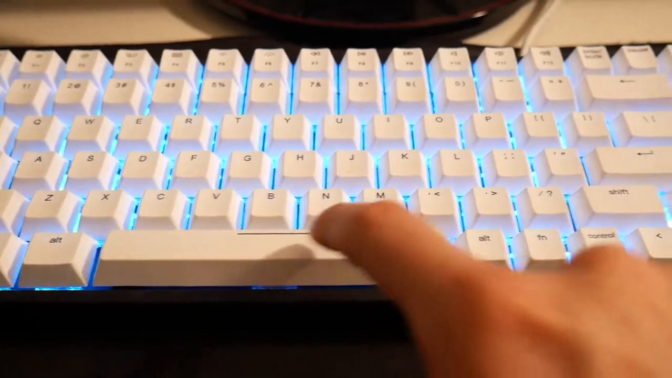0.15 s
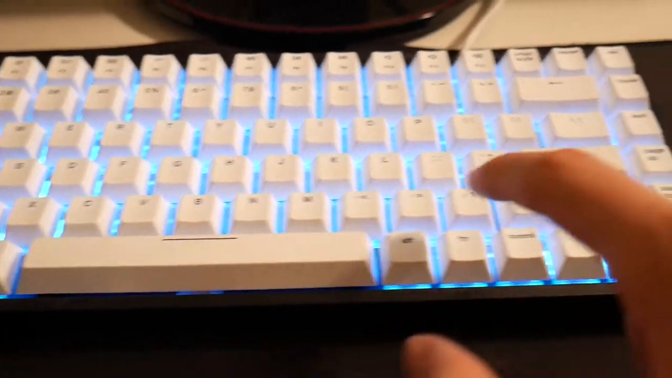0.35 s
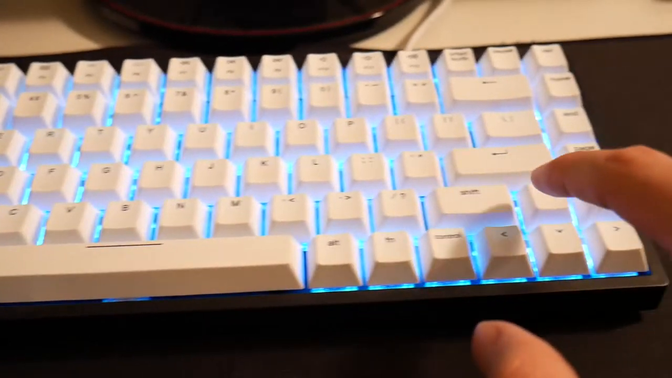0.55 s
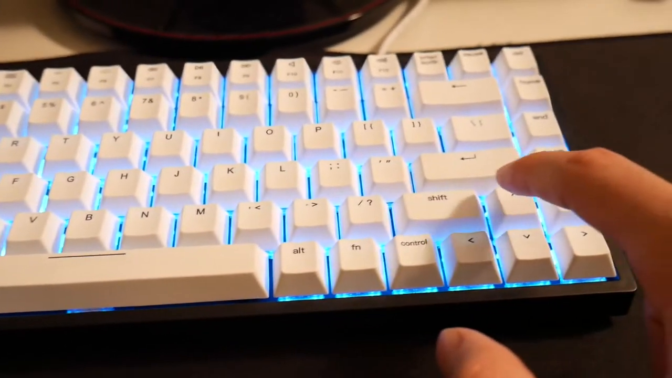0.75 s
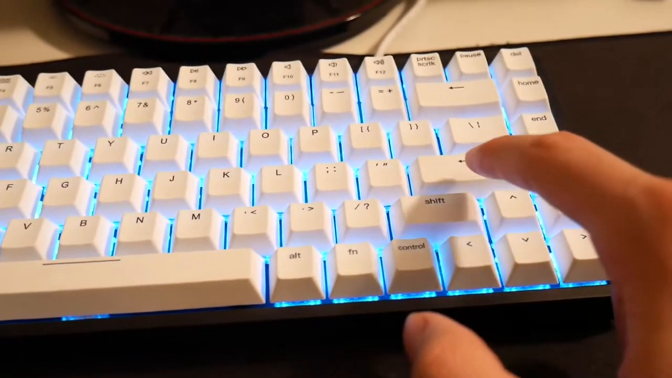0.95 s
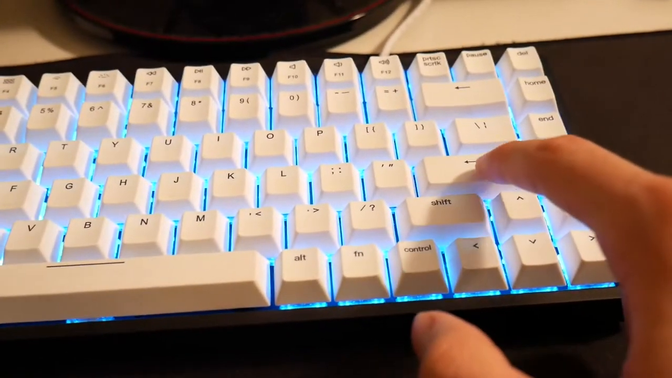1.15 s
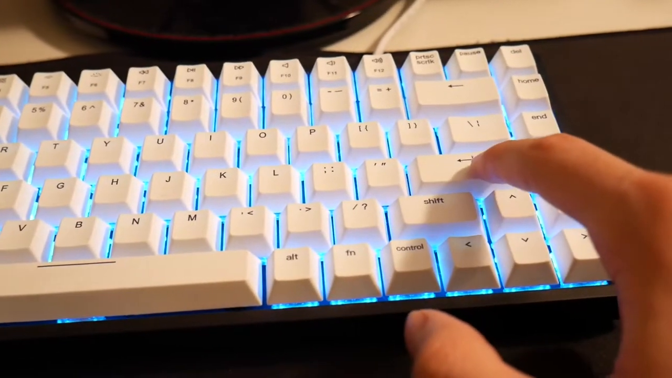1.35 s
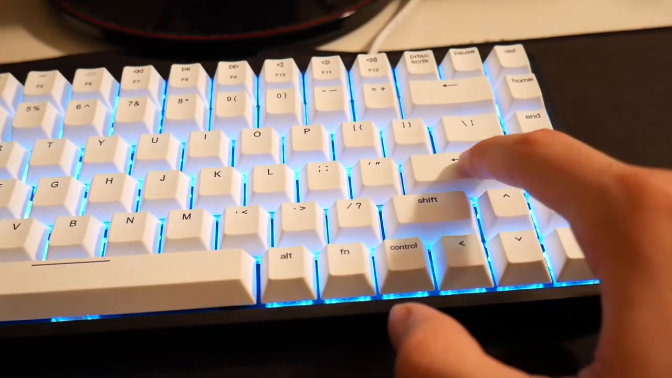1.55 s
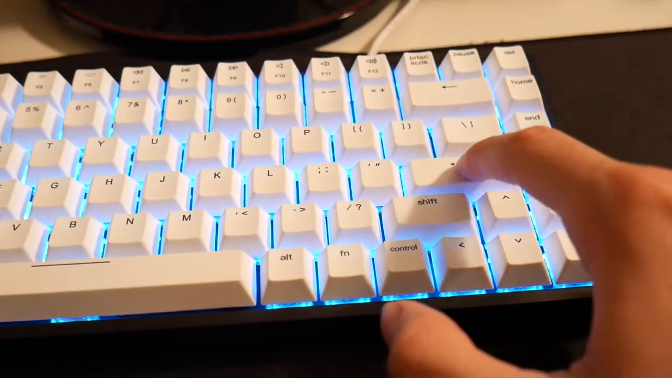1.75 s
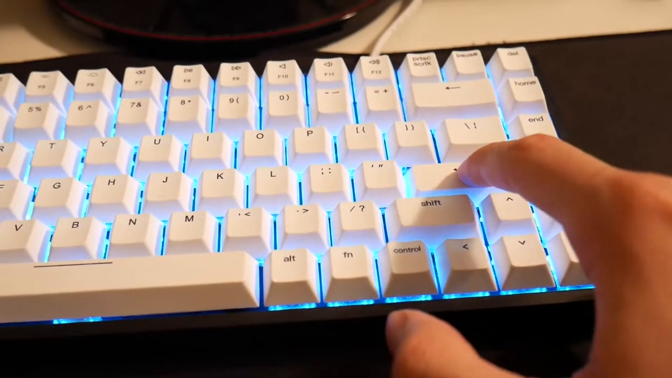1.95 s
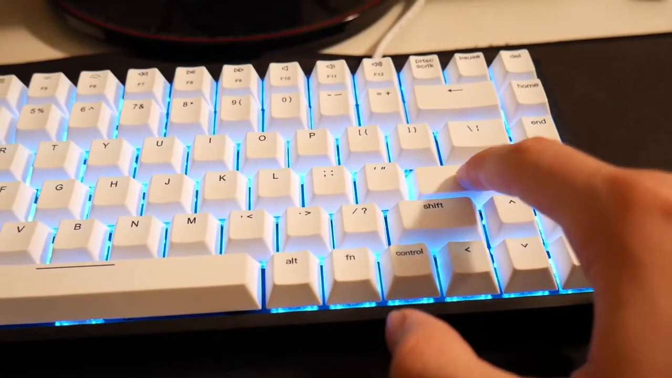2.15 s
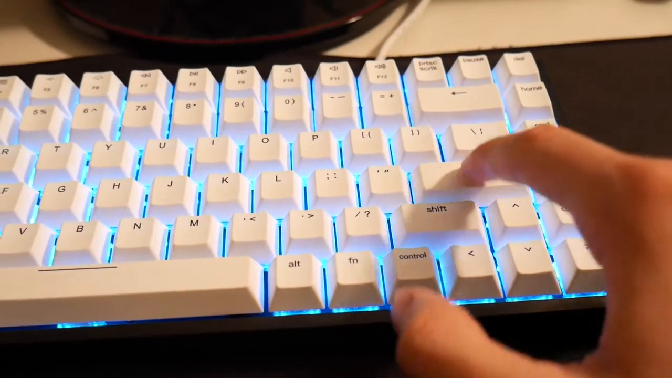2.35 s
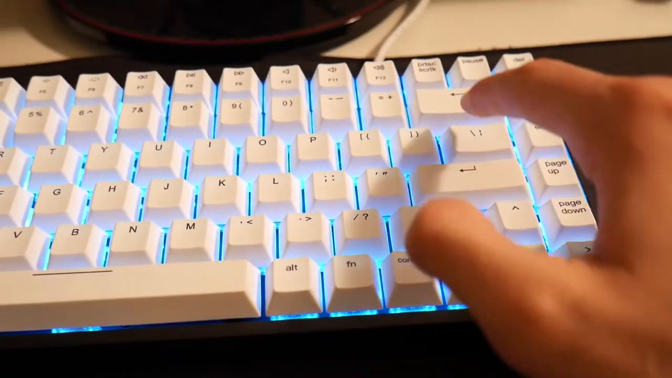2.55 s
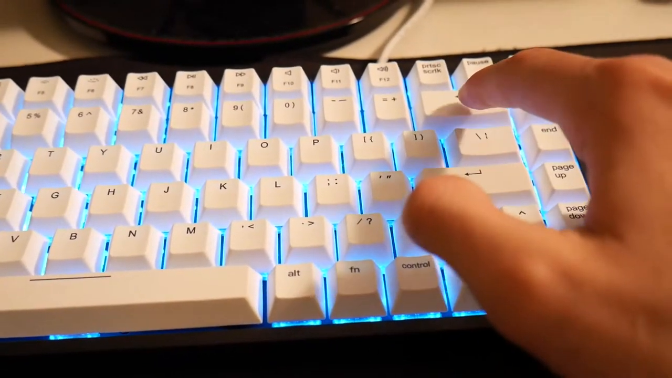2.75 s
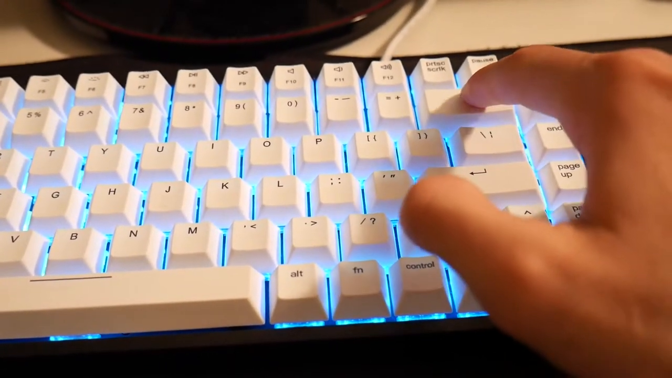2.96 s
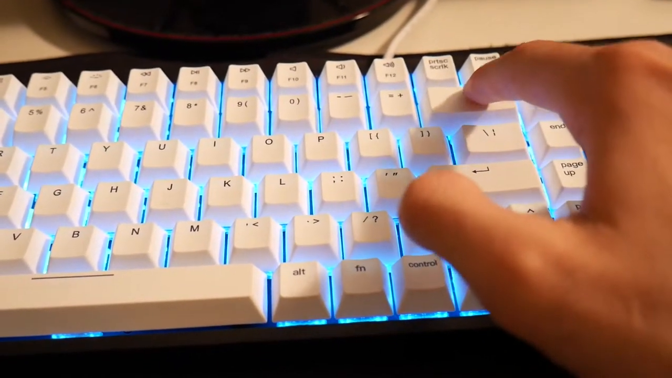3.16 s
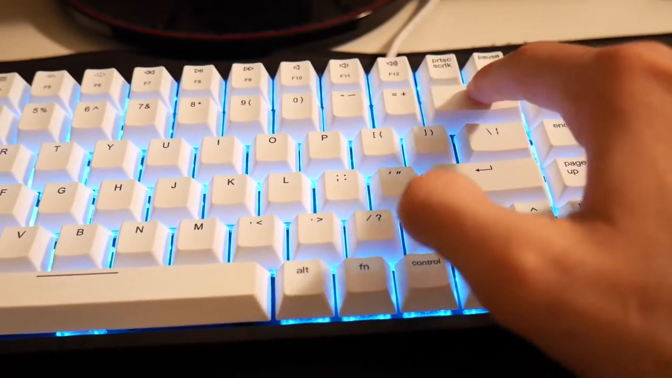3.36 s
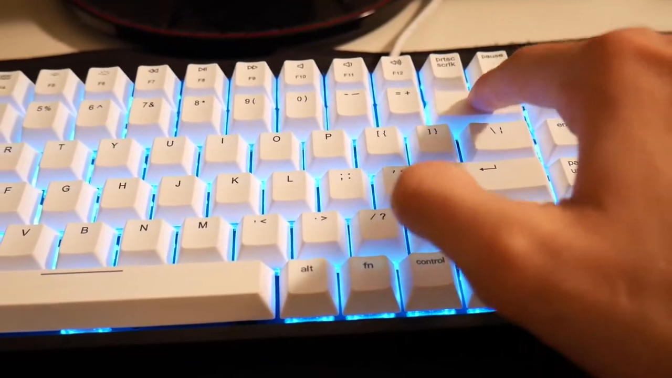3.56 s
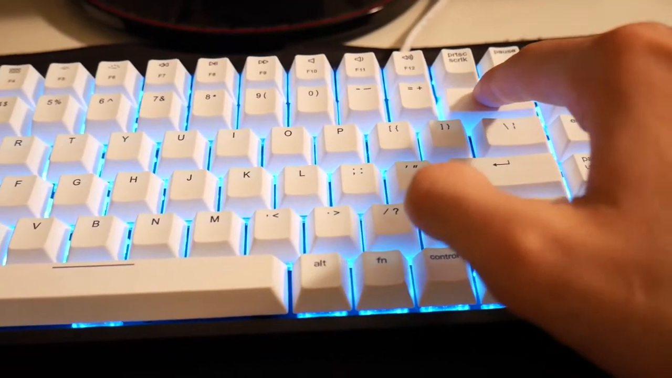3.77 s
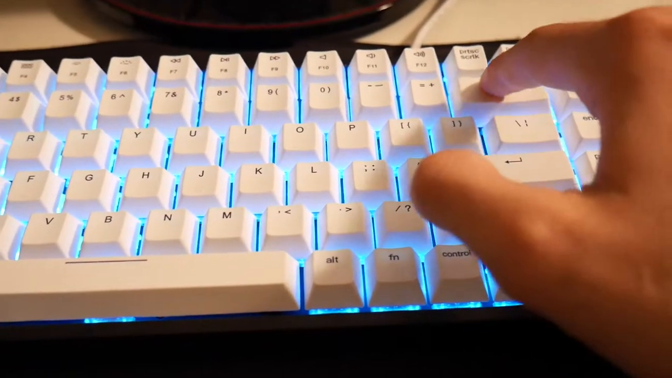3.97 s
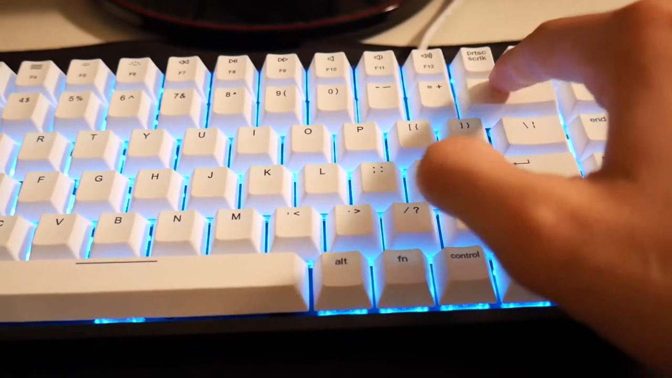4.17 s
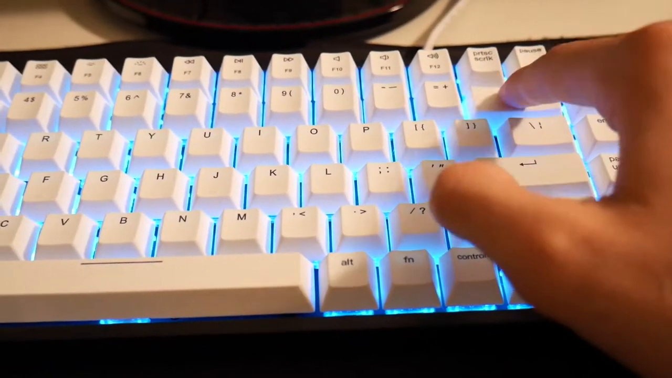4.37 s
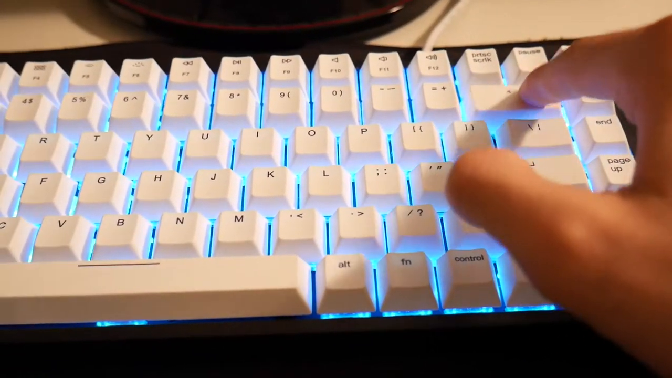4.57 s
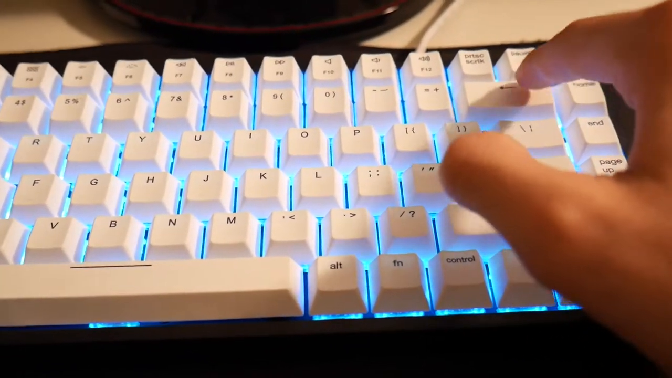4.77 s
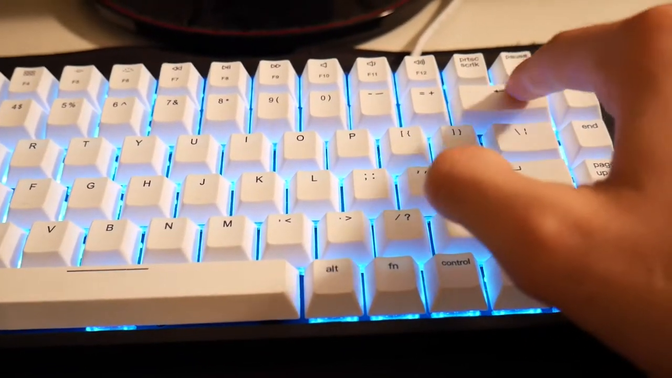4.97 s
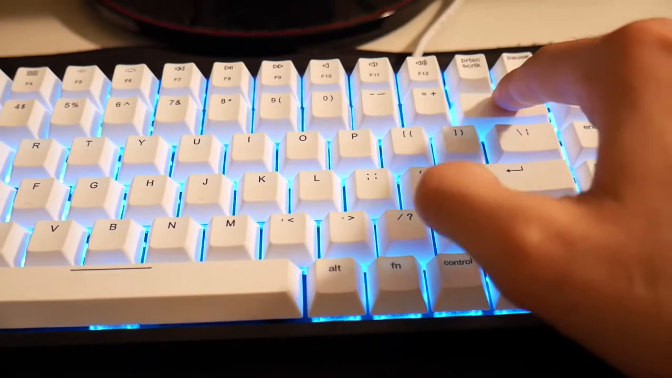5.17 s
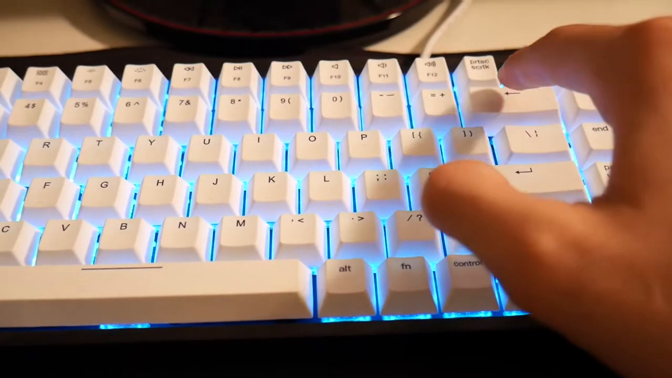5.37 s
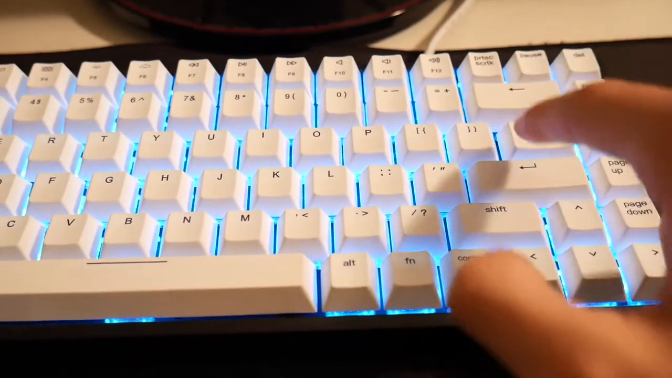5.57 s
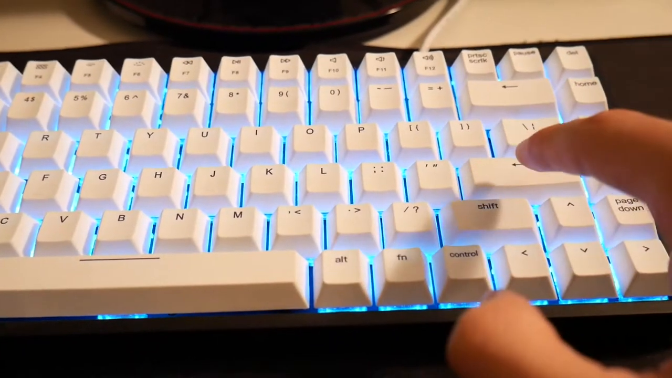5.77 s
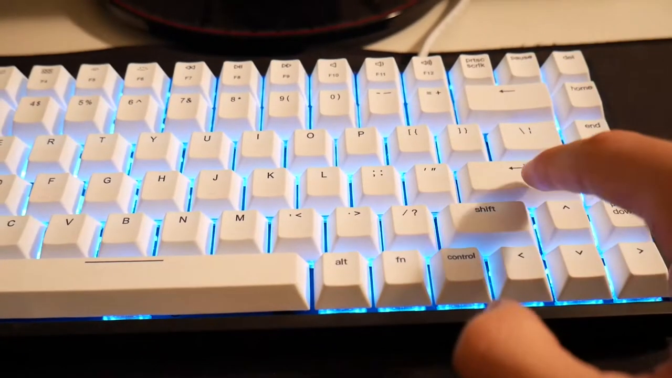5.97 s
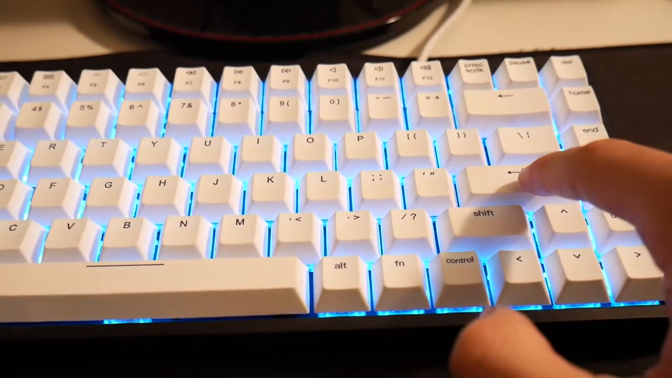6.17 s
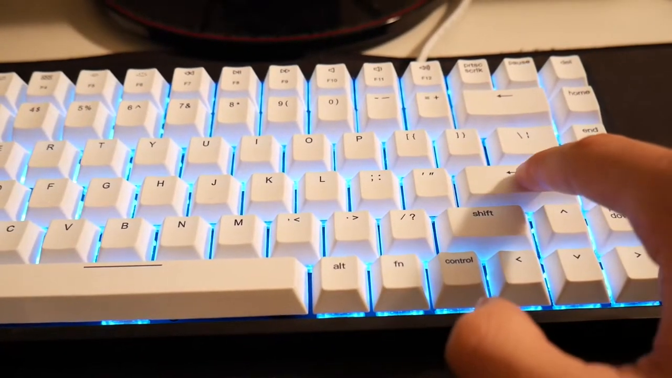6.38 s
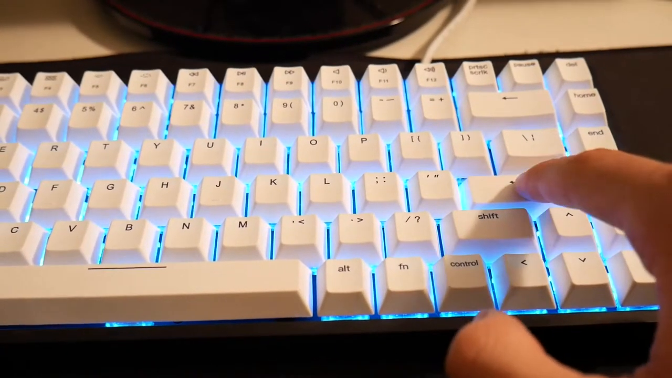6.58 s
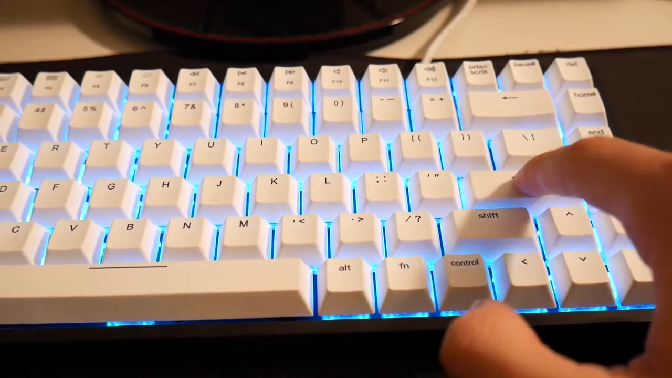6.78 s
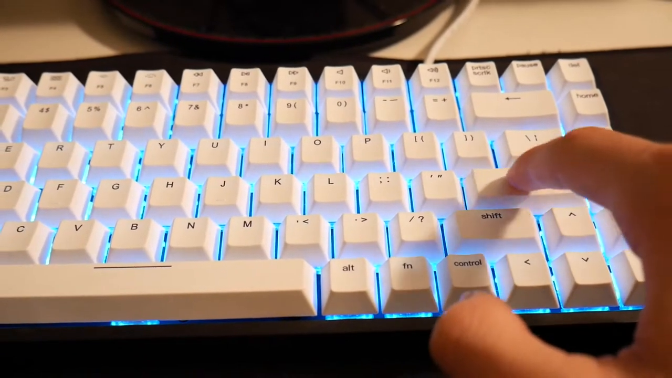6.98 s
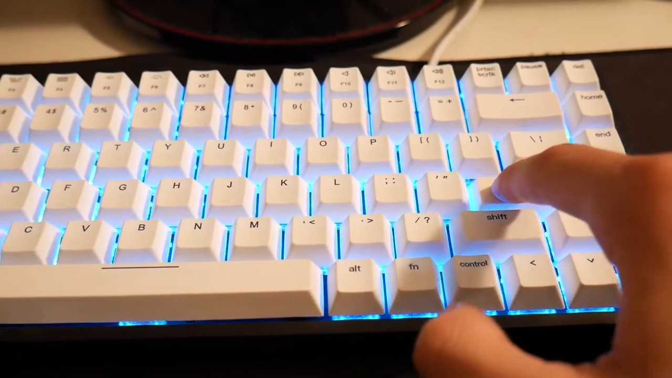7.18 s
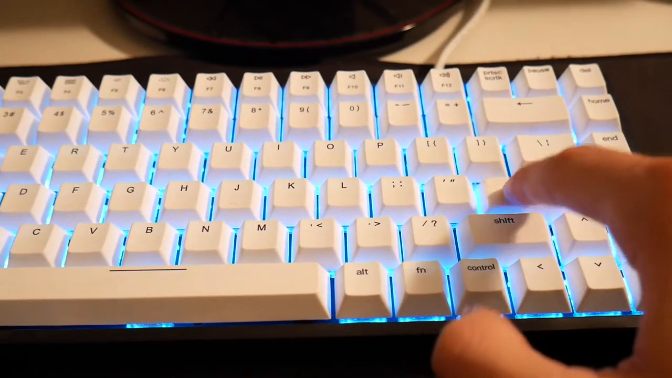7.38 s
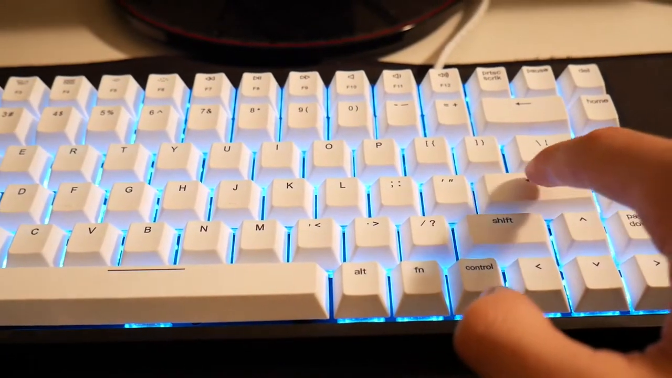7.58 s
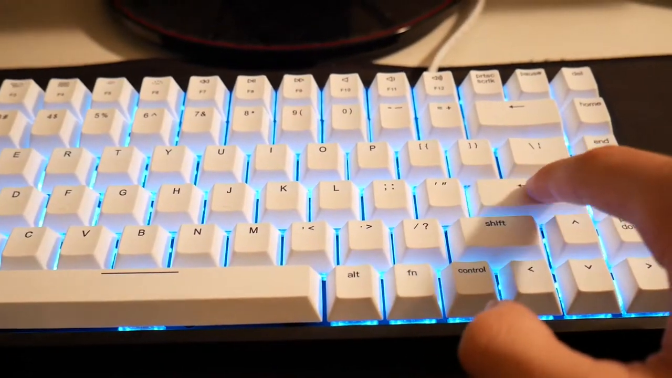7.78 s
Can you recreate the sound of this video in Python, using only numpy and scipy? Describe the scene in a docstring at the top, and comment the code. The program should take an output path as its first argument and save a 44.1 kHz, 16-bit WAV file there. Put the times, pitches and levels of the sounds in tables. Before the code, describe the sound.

Close up in a quiet room, a mechanical keyboard stands on a desk. Right at 0 seconds the space bar bottoms out with a loose, hollow thock and rattling wire, returning softly at 0.14. Near silence follows, with faint air, wavering low hum, a thin whine and a barely audible low tone twice around 1.4 and 1.6. Wide keys clack solidly at 1.7, 1.95 and 2.2, with dull, soft returns. A slight touch comes at 2.8. From 3.3 to 5.4 another key is pressed eight times, about every quarter second, brighter and harder, strongest near 3.8 and 4.4, each answered by a lighter upstroke, tiny finger snaps and spring ticks. After a pause, five fuller wide-key presses run evenly from 6.6 to 7.75, with sharp little taps before some. Short room reflections and a subsonic desk sway accompany the strokes.

```python
"""Wide keys of a mechanical keyboard clack under one finger: a tick, a bottom-out and a duller return.
Place: a desk in a quiet room. Distance: the microphone stands close by.
Blows ring modes of cap, plate, case and desk; filtered noise makes the cracks, rattle and rubbing stems.
The desk sways below hearing, decaying noise echoes answer as the room, and behind lie air, a faint
wavering hum, a thin whine and a low tone that sounds twice."""
import sys
import numpy as np
from scipy import signal
from scipy.fft import rfft, irfft
from scipy.io import wavfile

SR = 44100
rng = np.random.default_rng(int(sys.argv[2]) if len(sys.argv) > 2 else 0)


def put_to_file(sound):
    """Save the sound as 16-bit audio at rate SR, in the file named by the first command-line argument."""
    columns = np.atleast_2d(sound).T  # one column per channel
    safe = np.clip(columns, -1, 1)
    whole_steps = np.round(safe * 32767)
    wavfile.write(sys.argv[1], SR, whole_steps.astype(np.int16))


N = 345303   # length in samples

# keys pressed down, let up or only touched: [t/s, stroke, plate, cap, stem and case level/dB]
BLOWS = [(0.0004, "bar down", -39, -27.5, -36.5, -28.5), (0.1384, "bar up", -56, -51, -75, -41),
         (1.702, "wide down", -21, -26, -36.5, -36.5), (1.949, "wide down", -22, -26, -30.5, -40),
         (2.1028, "wide up", -45, -68, -78, -39), (2.2273, "wide down", -21.5, -23.5, -29.5, -36),
         (2.4129, "wide up", -38.5, -63, -66, -36.5), (2.812, "upper touched", -48, -77, -96, -59.5),
         (2.823, "upper touched", -37, -98, -87, -67), (3.275, "upper down", -28.5, -29, -35, -41.5),
         (3.4241, "upper up", -31, -50, -54, -42), (3.5491, "upper down", -19.5, -28, -33, -40),
         (3.674, "upper up", -23.5, -32.5, -48, -36.5), (3.8023, "upper down", -14.5, -15, -36.5, -36),
         (3.9822, "upper up", -36.5, -63, -64, -46), (4.0918, "upper down", -16, -19.5, -43.5, -35),
         (4.2282, "upper up", -19.5, -48.5, -57.5, -41), (4.364, "upper touched", -30.5, -47, -45, -46),
         (4.375, "upper down", -12.5, -9, -26, -36), (4.5181, "upper up", -35, -60, -71, -40.5),
         (4.6576, "upper down", -19.5, -16.5, -34, -35), (4.7782, "upper up", -31, -62, -53, -37),
         (4.9211, "upper down", -21.5, -16.5, -37.5, -38.5), (5.0373, "upper up", -27, -37.5, -47.5, -36),
         (5.2236, "upper down", -22.5, -15, -30.5, -44.5), (5.375, "upper up", -18.5, -27, -27, -34),
         (6.6155, "wide down", -23, -27.5, -32, -37.5), (6.789, "wide up", -64, -78, -79, -49.5),
         (6.876, "wide down", -19.5, -24.5, -40.5, -39), (7.0224, "wide up", -39, -53.5, -59, -36),
         (7.1771, "wide down", -28.5, -38.5, -49.5, -40), (7.3082, "wide up", -38.5, -56, -57.5, -38),
         (7.4633, "wide down", -16.5, -25.5, -37, -33.5), (7.5827, "wide up", -33, -58, -56.5, -33.5),
         (7.7515, "wide down", -22, -30.5, -44, -42.5)]
# what each kind of stroke also moves: {stroke: (rim over cap/dB, crack over stem/dB, top fizz over crack/dB,
# rattle over plate/dB, desk over case/dB, shell over case/dB, sway over case/dB, stem rubbing level/dB)}
STROKES = {"bar down": (-12, -8.5, -11, 1.5, 2, -1, -15, -58),
           "bar up": (-29, -20.5, -6, -18, -6, -33, -3, -79.5),
           "wide down": (-1.5, -2, -18, -31, 5, -7.5, -6.5, -68.5),
           "wide up": (4, -6.5, -21, -29, -13.5, -10, -9.5, -80),
           "upper down": (-12.5, -10.5, 0, -37.5, -1.6, -20.5, 0.5, -67.5),
           "upper up": (-12, -3, -4.5, -41.5, -8, 0, -0.3, -79),
           "upper touched": (-7, -8, -6.5, -40.5, 2.5, 5.5, 3, -93.5)}
# finger taps and stem rattles: [t/s, snap level/dB, spring level/dB]
TICKS = [(0.1088, -49.5, -72), (1.6756, -61, -67), (1.9006, -50, -51), (2.1909, -52, -61.5),
         (3.23, -77, -55), (3.3535, -69, -36), (3.398, -64, -40.5), (3.502, -70, -52), (3.6057, -68, -45),
         (3.6469, -55, -45), (3.7636, -49, -34.5), (3.928, -65, -51), (3.946, -86, -50),
         (4.025, -56, -48.5), (4.063, -68, -40), (4.2043, -64, -47), (4.343, -43.5, -40.5),
         (4.4514, -82.5, -39.5), (4.4958, -60.5, -54.5), (4.618, -32.5, -33), (4.709, -63.5, -43.5),
         (4.7533, -61.5, -48), (4.884, -38.5, -38.5), (4.9575, -62, -45), (5.01, -61, -47),
         (5.0245, -40.5, -34.5), (5.1814, -47.5, -39), (5.295, -72, -52), (5.361, -48, -37.5),
         (6.566, -61, -51), (6.8261, -46.5, -46.5), (7.0093, -52, -56.5), (7.118, -29.5, -44),
         (7.2875, -61, -60), (7.432, -22.5, -65), (7.5405, -48, -45), (7.708, -59.5, -51),
         (7.7274, -66, -71)]
# knocks of the space bar on both stops: [t/s, level/dB]
BAR_KNOCKS = [(0.0006, -27), (.14, -40.5)]

# modes of each part, levels relative to its blow: [f/Hz, level/dB, t60/s]
# the desk top
DESK_MODES = [(50, 0, 0.2), (78, -8, .08), (139, 1.5, 0.14)]
# the keyboard case: [f/Hz, level/dB, t60/s]
CASE_MODES = [(217.3, -2, 0.13), (249.7, 2, 0.084), (339.5, -6, 0.095), (392, -4, 0.037)]
# the shell of the case, higher modes: [f/Hz, level/dB, t60/s]
SHELL_MODES = [(420, -9.5, .035), (548, -5, 0.073), (695, -6, 0.013), (714, -2, 0.046), (825, -7, 0.025)]
# the plate that holds the keys: [f/Hz, level/dB, t60/s]
PLATE_MODES = [(1120, -4, .024), (1200, -8, .018), (1290, -6, .024), (1400, -8, .016)]
# the key cap: [f/Hz, level/dB, t60/s]
CAP_MODES = [(1720, -5, .012), (1880, -5, .014), (2100, -8, .012), (2300, -10.5, .012), (2550, -14, .012)]
# the rim of the cap: [f/Hz, level/dB, t60/s]
RIM_MODES = [(2800, -3, .008), (3100, -3, .008), (3450, 0, .009), (3950, -8, .006)]
# the spring under the key: [f/Hz, level/dB, t60/s]
SPRING_MODES = [(5800, -3, .022), (5950, -5, .02), (6200, -7, .012), (6700, -11, .008)]
# the hollow space bar: [f/Hz, level/dB, t60/s]
BAR_MODES = [(251, 2, 0.24), (348, 1.5, 0.12), (424, -7.5, 0.097), (567, -8.5, 0.037), (644, -8.5, 0.042)]

# the fingertip brushes over the caps: [from t/s, to t/s, level/dB]
BRUSH = [(.86, .95, -86)]
# a thin squeak while a key is let up: [from t/s, to t/s, level/dB]
SQUEAK = [(2.06, 2.07, -77.5)]
# the hand is busy on the keys and the desk trembles: [from t/s, to t/s, level/dB]
BUSY = [(0.0, .2, -35), (1.757, 2.33, -36.5), (2.702, 2.9, -50.5), (3.33, 3.75, -42.5), (3.85, 4.75, -34),
        (4.95, 5.4, -37), (6.65, 7.83, -38.5)]
# room echoes by octave, level before their gradual onset: [f/Hz, level/dB, t60/s]
ROOM_OCTAVES = [(675, -25, 0.28), (1365, -24, 0.14), (3007, -19, 0.21), (5530, -16, 0.17),
                (12200, -15.5, 0.066)]
# spectrum of the room air, relative only: [f/Hz, level/dB]
AIR_SPECTRUM = [(9, -24), (16, 6.5), (38, -15), (66, -4), (84, -22), (120, -11.5), (145, -21), (215, -20.5),
                (490, -27), (600, -29.5), (1400, -38.5), (2500, -49.5), (11500, -58.5), (16400, -67.5)]
# wavering hum lines: [f/Hz, width/Hz, level/dB]
HUM_LINES = [(57.4, 5.4, -66.5), (116, 1, -68.5), (213.5, 2.1, -74.5), (376, 5, -75.5)]
# a low tone sounds twice: [from t/s, to t/s, level/dB]
FAINT_TONE = [(1.34, 1.5, -68), (1.595, 1.61, -66)]

# delay of a bounce; how far it lies under the first contact, for ringing parts and for snaps
BOUNCE_S, BOUNCE_DB, SNAP_BOUNCE_DB = 0.0105, -11.5, -13
BAR_DB, BAR_T60_S = -41, 0.32                # the long space bar shakes on
BAR_FIRST_DB, BAR_FIRST_T60_S = -34, 0.083   # and hardest at first
TICK_CAP_DB, TICK_CAP_FOLLOWS = -53, 0.7     # cap under a -50 dB snap; share of the snap's change
TICK_CASE_DB = -53.5                         # case under -50 dB of snap and spring
TICK_CASE_FOLLOWS = (0.19, 0.3)              # shares of the change in (snap, spring)
TRAVEL_S = 0.029                             # the stem slides this long before it stops
SQUEAK_HZ, SWAY_HZ, SWAY_T60_S = 4300, 17.5, 0.11
STILL_DB = -58.5                             # tremble under the resting hand
AIR_DB, WHINE_HZ, WHINE_DB, FAINT_TONE_HZ = -57, 605.5, -76.5, 440
CUTOFF_HZ = 16800
# how gains enter and leave: (rise, fall) in dB per s
RUBBING_EDGES, BRUSH_EDGES, SQUEAK_EDGES = (600, 230), (56, 33), (3300, 56)
TREMBLE_EDGES, FAINT_TONE_EDGES = (600, 140), (390, 440)
RUBBING_WAVER_DB, TREMBLE_WAVER_DB, WAVER_KNOTS_PER_S = 1, 8, 5


def blows():
    """Bottom-outs and returns: parts ring or crack, each with its own small lead or lag."""
    s, level = parts()
    ringing = (
        strike(s + 0.0013, level["desk"], DESK_MODES, chatter_s=0.0044, lo_hz=49, soft_hz=173, turn=0.93)
        + strike(s - 0.0006, level["case"], CASE_MODES, chatter_s=0.0019, lo_hz=180, soft_hz=468.6)
        + strike(s - 0.0004, level["shell"], SHELL_MODES, chatter_s=0.0017, lo_hz=380, soft_hz=1000)
        + strike(s + 0.0007, level["plate"], PLATE_MODES, chatter_s=0.0026, lo_hz=1030, soft_hz=1600)
        + strike(s, level["cap"], CAP_MODES, chatter_s=0.0012, lo_hz=1500, soft_hz=3000)
        + strike(s, level["rim"], RIM_MODES, chatter_s=0.0013, lo_hz=2400, soft_hz=4600))
    cracking = (
        crack(s, level["stem"], 4320, 8020, t60=0.012, rise_s=0.0002)
        + crack(s, level["crack"], 6200, 13000, t60=0.011, rise_s=0.0004)
        + crack(s, level["fizz"], 11500, 16600, t60=0.01, rise_s=0.0004))
    # the stabiliser wire shakes on
    rattle = crack(s, level["rattle"], 1100, 4000, t60=0.11, rise_s=0.0073)
    return ringing + cracking + rattle


def parts():
    """Time of every blow and the level in dB at which it drives each part."""
    s, plate, cap, stem, case = np.transpose([row[:1] + row[2:] for row in BLOWS])
    rim, snap, fizz, rattle, desk, shell, rock, _ = np.transpose([STROKES[row[1]] for row in BLOWS])
    return s, {"plate": plate, "cap": cap, "stem": stem, "case": case,
               "rim": cap + rim, "crack": stem + snap, "fizz": stem + snap + fizz,
               "rattle": plate + rattle, "desk": case + desk, "shell": case + shell, "sway": case + rock}


def strike(s, db, modes, chatter_s, lo_hz, soft_hz, turn=-1):
    """A part is hit, touched again within the chatter time, and bounces; each mode takes its own share.

    Neighbouring modes swing opposite (turn below 0) or together (turn above 0, a dip between them)."""
    luck_db = rng.normal(0, 2.1, (len(s), len(modes)))
    again_s = rng.uniform(0, chatter_s, (len(s), len(modes)))
    out = np.zeros(N)
    for k, (hz, mode_db, t60) in enumerate(modes):
        level_db = db + mode_db + luck_db[:, k]
        touches = clicks(s, level_db) + clicks(s + again_s[:, k], level_db - 0.5)
        bounce = clicks(s + BOUNCE_S, level_db + BOUNCE_DB)
        out += turn ** k * ring(touches + bounce, hz, t60)
    # a contact takes time, so little far above the modes is excited
    out = signal.sosfilt(signal.butter(4, soft_hz, fs=SR, output="sos"), out)
    # a part radiates poorly below its modes
    return signal.sosfilt(signal.butter(2, lo_hz, "high", fs=SR, output="sos"), out)


def crack(s, db, lo_hz, hi_hz, t60, rise_s):
    """Loose plastic contact: a puff of noise swells quickly and dies, then bounces twice."""
    touches = clicks(s, db)
    for k in (1, 2):
        touches += clicks(s + k * BOUNCE_S, db + SNAP_BOUNCE_DB - 7.5 * (k - 1))
    envelope = signal.lfilter([1], [1, -amp(-60 / (t60 * SR))], touches + 1e-18)
    swell = np.exp(-1 / (rise_s * SR))
    envelope = signal.lfilter([1 - swell], [1, -swell], envelope)
    share = np.sqrt(2 * (hi_hz - lo_hz) / SR)   # part of white noise that the band keeps
    puff = envelope * rng.standard_normal(N)
    return band(band(puff, lo_hz, hi_hz), lo_hz, hi_hz) / share


def space_bar():
    """The hollow bar knocks on its stops, and its loose wire keeps tickling the cap modes."""
    t = np.arange(N) / SR
    shaken = sum(ring(rng.standard_normal(N), hz, t60) * amp(db) for hz, db, t60 in CAP_MODES)
    dying = amp(BAR_DB - 60 * t / BAR_T60_S) + amp(BAR_FIRST_DB - 60 * t / BAR_FIRST_T60_S)
    knocks = strike(*np.transpose(BAR_KNOCKS), BAR_MODES, chatter_s=0.0027, lo_hz=194, soft_hz=900)
    return rms_one(band(shaken, 1400, 2300)) * dying + knocks


def ticks():
    """Light touches: a snap of noise, the spring sings, cap and case barely move."""
    s, snap, spring = np.transpose(TICKS)
    cap = TICK_CAP_DB + TICK_CAP_FOLLOWS * (snap + 50)
    case = TICK_CASE_DB + np.dot(TICK_CASE_FOLLOWS, [snap + 50, spring + 50])
    return (crack(s, snap, 3700, 13000, t60=0.008, rise_s=0.00073)
            + strike(s, spring, SPRING_MODES, chatter_s=0.0058, lo_hz=5200, soft_hz=7200)
            + crack(s, cap, 800, 4500, t60=0.031, rise_s=0.00027)
            + strike(s + 0.0011, case, CASE_MODES, chatter_s=0.00042, lo_hz=180, soft_hz=400))


def slide():
    """Stick and slip: uneven grains of noise for stem and fingertip, noise through a resonance for a squeak."""
    grain_size = amp(2.5 * np.minimum(rng.exponential(1, N), 4))
    grain_here = rng.random(N) < 6000 / SR   # about 6000 grains per s
    grains = rng.standard_normal(N) * grain_size * grain_here
    travels = [(s - TRAVEL_S, s, STROKES[stroke][-1]) for s, stroke, *_ in BLOWS]
    rubbing_gain = held(travels, RUBBING_EDGES) * waver(RUBBING_WAVER_DB)
    rubbing = rms_one(band(grains, 2200, 14000)) * rubbing_gain
    brush = rms_one(band(grains, 2300, 2800)) * held(BRUSH, BRUSH_EDGES)
    whistle = ring(rng.standard_normal(N), SQUEAK_HZ, 0.025)
    squeak = rms_one(whistle) * held(SQUEAK, SQUEAK_EDGES)
    return rubbing + brush + squeak


def sway():
    """Blows rock the desk, which rocks the microphone: two slow swings in a row, so it swells first."""
    s, level = parts()
    unit = ring(ring(clicks(np.zeros(1), 0), SWAY_HZ, SWAY_T60_S), SWAY_HZ, SWAY_T60_S)
    rocking = ring(ring(clicks(s, level["sway"]), SWAY_HZ, SWAY_T60_S), SWAY_HZ, SWAY_T60_S)
    tremble = rms_one(band(band(rng.standard_normal(N), 9, 25), 9, 25))
    tremble *= amp(STILL_DB) + held(BUSY, TREMBLE_EDGES) * waver(TREMBLE_WAVER_DB)
    return tremble - rocking / np.abs(unit).max()


def room(x):
    """Dense reflections: noise that arrives after the trip to the walls and dies, octave by octave."""
    t = np.arange(SR // 2) / SR
    response = np.zeros(len(t))
    for hz, db, t60 in ROOM_OCTAVES:
        noise = band(rng.standard_normal(len(t)), hz / np.sqrt(2), hz * np.sqrt(2))
        echoes = noise * amp(-60 * t / t60)
        response += amp(db) * echoes / np.sqrt(np.sum(echoes ** 2))
    onset = 1 - np.exp(-(t / 0.0082) ** 2)
    return signal.fftconvolve(x, response * onset)[:N]


def room_air():
    """Steady noise shaped by the air spectrum."""
    hz = np.maximum(np.fft.rfftfreq(N, 1 / SR), 1)
    points_hz, db = np.transpose(AIR_SPECTRUM)
    shape = amp(np.interp(np.log(hz), np.log(points_hz), db))
    return amp(AIR_DB) * rms_one(irfft(rfft(rng.standard_normal(N)) * shape, N))


def hum():
    """Noise through narrow resonances: the narrower a line, the slower it wavers."""
    out = np.zeros(N)
    for hz, width_hz, db in HUM_LINES:
        t60 = np.log(1000) / np.pi / width_hz
        out += amp(db) * rms_one(ring(rng.standard_normal(N), hz, t60))
    return out


def faint_tones():
    """Two sines: a steady thin whine and the low tone that sounds twice."""
    t = np.arange(N) / SR
    whine = amp(WHINE_DB) * np.sin(2 * np.pi * WHINE_HZ * t)
    tone = held(FAINT_TONE, FAINT_TONE_EDGES) * np.sin(2 * np.pi * FAINT_TONE_HZ * t)
    return np.sqrt(2) * (whine + tone)   # levels are rms


def amp(db):
    """dB to gain."""
    return 10 ** (np.asarray(db) / 20)


def rms_one(x):
    """Scale to rms 1."""
    return x / np.sqrt(np.mean(x ** 2) + 1e-20)


def band(x, lo_hz, hi_hz):
    """Butterworth band-pass."""
    return signal.sosfilt(signal.butter(2, [lo_hz, min(hi_hz, SR / 2.2)], "band", fs=SR, output="sos"), x)


def ring(x, hz, t60):
    """Damped resonator: a unit click sets a sine of height 1 ringing, 60 dB down after t60 s."""
    r = amp(-60 / (t60 * SR))
    w = 2 * np.pi * hz / SR
    return signal.lfilter([0, np.sin(w)], [1, -2 * r * np.cos(w), r * r], x + 1e-18)


def clicks(s, db):
    """One single-sample click at each time."""
    out = np.zeros(N)
    np.add.at(out, np.clip(np.round(s * SR).astype(int), 0, N - 1), amp(db))
    return out


def held(rows, edges):
    """Gain in time from (from s, to s, dB) rows: rise, hold, fall, with edges straight in dB."""
    t = np.arange(N) / SR
    rise, fall = edges
    return sum(amp(db - rise * np.maximum(start - t, 0) - fall * np.maximum(t - end, 0))
               for start, end, db in rows)


def waver(db):
    """A gain that wanders by db (standard deviation at the knots) a few times a second."""
    knots = rng.standard_normal(100)
    place = np.arange(N) / SR * WAVER_KNOTS_PER_S
    return amp(db * np.interp(place, np.arange(len(knots)), knots))


def scene():
    """Keys in their room, the swaying desk and the background."""
    heavy = blows()
    light = ticks() + slide()
    echoes = room(heavy + amp(-7) * light)   # ticks and rubbing close to the microphone leave fainter echoes
    background = room_air() + hum() + faint_tones()
    return (heavy + space_bar() + light + sway() + echoes + background)[None]


def record(dry):
    """A steep low-pass cuts the top."""
    return signal.sosfilt(signal.cheby2(18, 70, CUTOFF_HZ, fs=SR, output="sos"), dry)


dry = scene()
out = record(dry)
put_to_file(out)
```